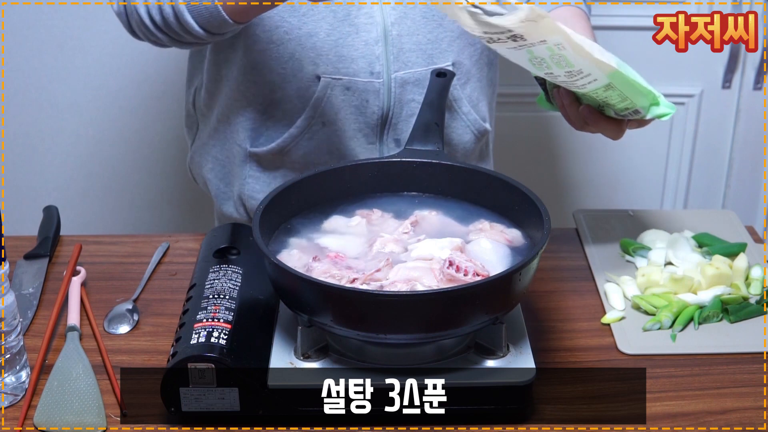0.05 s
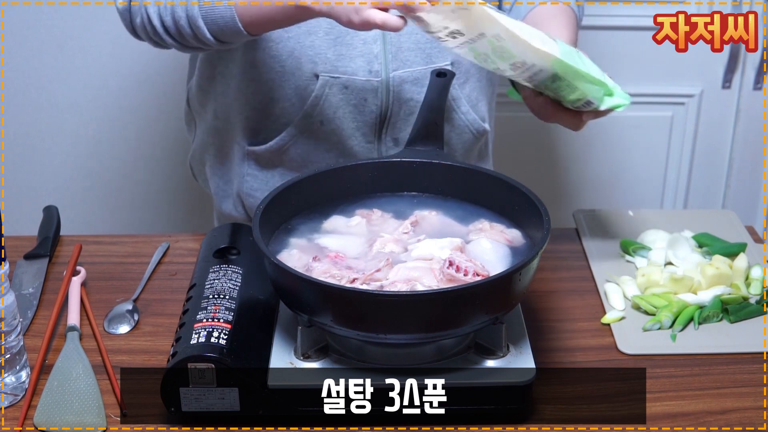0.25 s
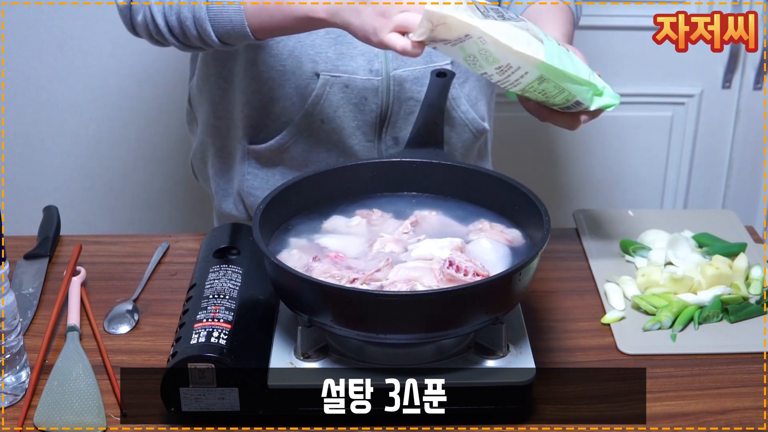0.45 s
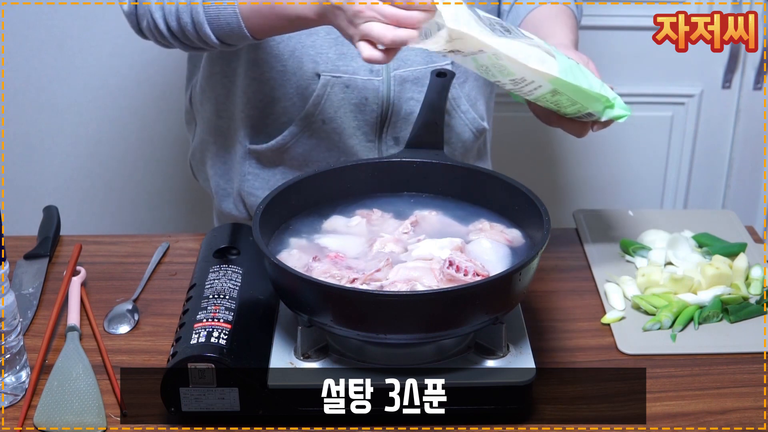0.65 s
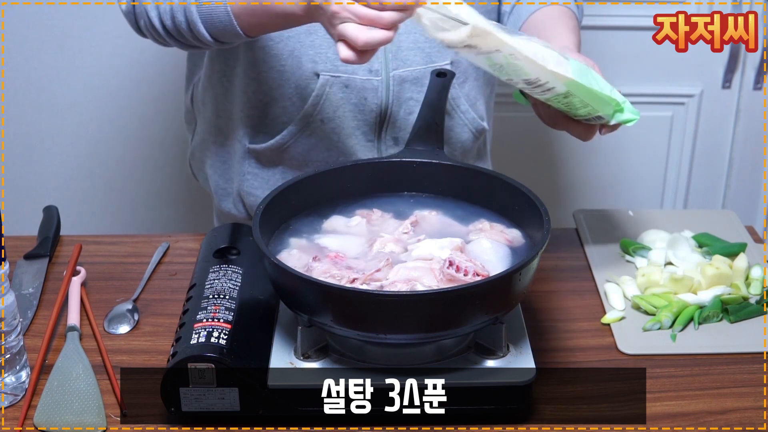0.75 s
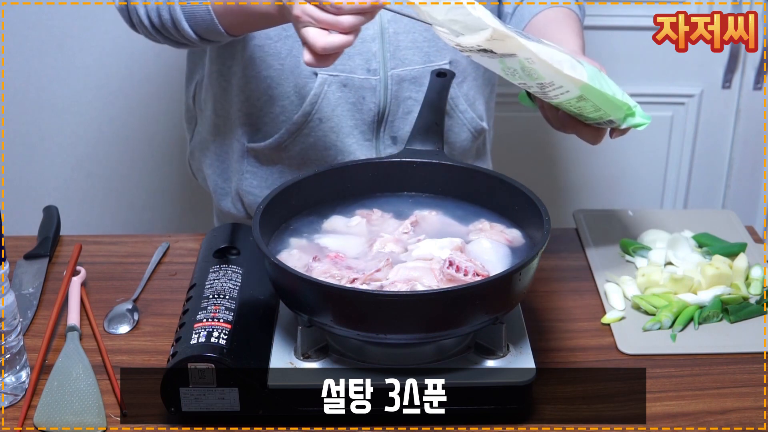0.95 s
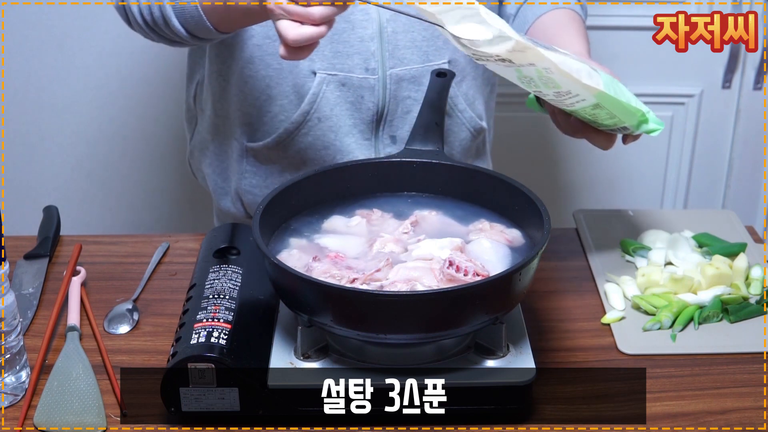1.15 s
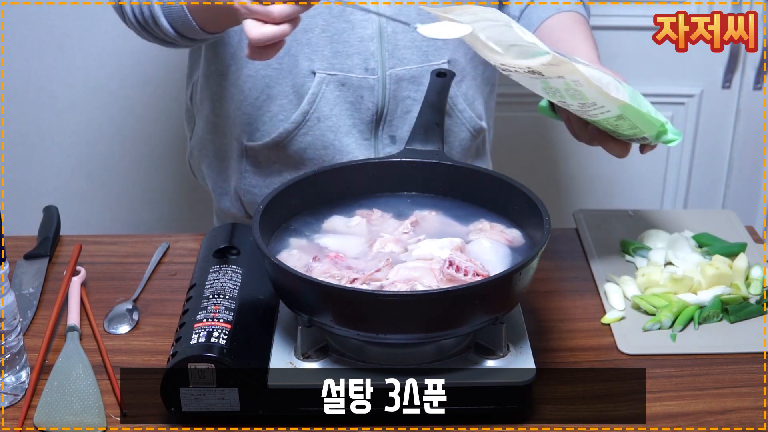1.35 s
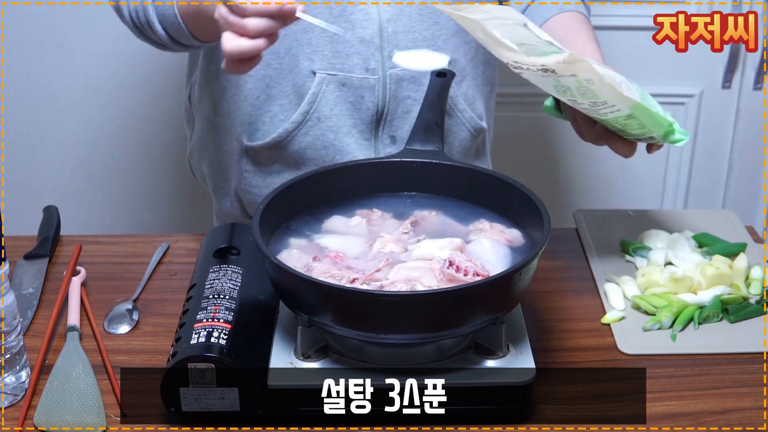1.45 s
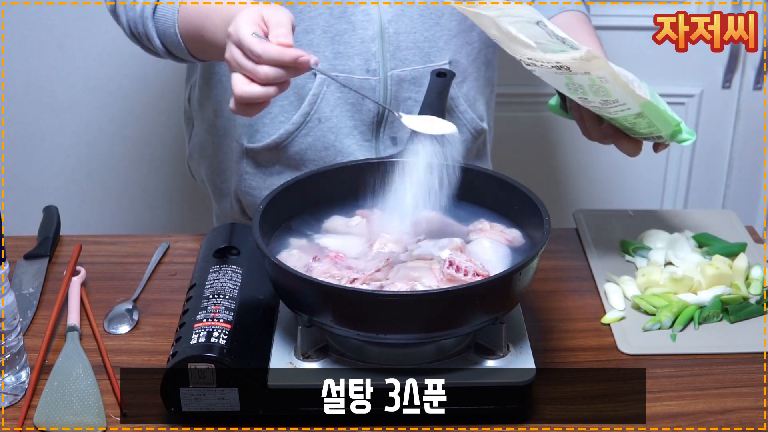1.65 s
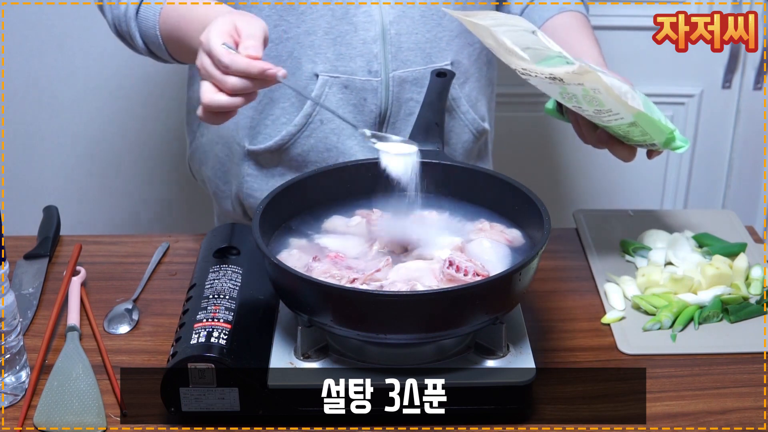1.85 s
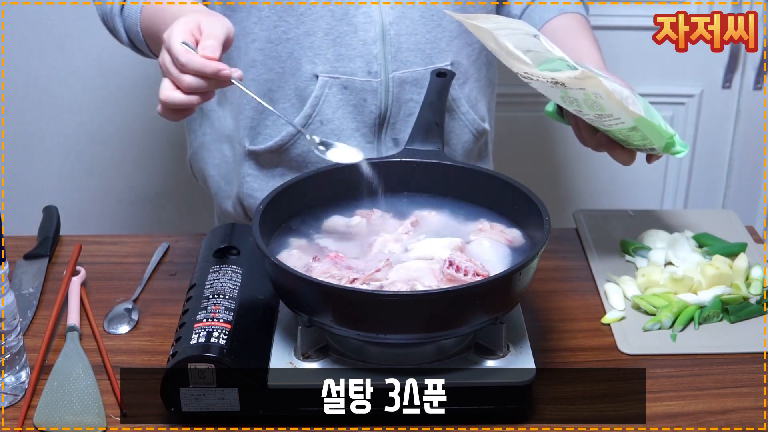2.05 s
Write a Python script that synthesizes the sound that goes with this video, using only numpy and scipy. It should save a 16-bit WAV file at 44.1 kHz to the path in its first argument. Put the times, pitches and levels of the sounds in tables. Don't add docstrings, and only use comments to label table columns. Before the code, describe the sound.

Spoon scooping granulated sugar from a crinkly bag, with crunch, fizzing grains and dull little thuds

```python
import sys
import numpy as np
from scipy import signal
from scipy.fft import rfft, irfft
from scipy.io import wavfile
from scipy.ndimage import uniform_filter1d

SR = 44100
rng = np.random.default_rng(int(sys.argv[2]) if len(sys.argv) > 2 else 0)


def how_loud(loudness_db):
    steps = np.asarray(loudness_db, float) / 20
    return 10 ** steps


def store_wav(level_fs):
    pcm = np.round(np.clip(np.atleast_2d(level_fs), -1, 1) * 32767)
    wavfile.write(sys.argv[1], SR, pcm.T.astype(np.int16))


N = 92610


def evened(x):
    return x / np.sqrt(np.mean(x ** 2) + 1e-20)


def read(points, hz):
    table_hz, value = np.transpose(points)
    return np.interp(np.log(hz + 1), np.log(table_hz + 1), value)


def colour(x, points):
    level_db = np.maximum(read(points, abs(np.fft.fftfreq(4096, 1 / SR))), -90)
    log_gain = np.log(how_loud(level_db))
    taps = np.fft.ifft(np.exp(np.conj(signal.hilbert(log_gain)))).real[:2048]
    return signal.oaconvolve(x, taps / np.linalg.norm(taps))[:N]


def resonate(x, hz, width):
    radius = np.exp(-np.pi * width / SR)
    pole = radius * np.exp(2j * np.pi * hz / SR)
    return 2 * signal.lfilter([1 - radius], [1, -pole], x).real


def wander(per_s):
    size = int(SR / per_s)
    smooth = uniform_filter1d(rng.standard_normal(N), size)
    return evened(uniform_filter1d(smooth, size))


def air():
    # (frequency [Hz], level [dB])
    spectrum = [(12, -45), (20, -21.5), (65, -0.5), (86, -14.5), (410, -15.5), (759, -23), (1000, -14.5),
                (2140, -27), (16000, -27.5)]
    # (frequency [Hz], likeness [0 to 1])
    likeness = [(60, 0.68), (180, 0.69), (550, 0.75), (1650, 0.92), (4970, 0.47), (15000, 0.32)]
    frames, hz = N // 256 + 5, np.fft.rfftfreq(1024, 1 / SR)
    a, b, c, d, patches = rng.standard_normal((frames, 513, 5)).T
    patches = uniform_filter1d(patches, size=10, axis=0)
    patches = evened(uniform_filter1d(patches, size=12, axis=1))
    same = np.clip(read(likeness, hz), -1, 1)[:, None]
    left = a + 1j * b
    right = same * left + np.sqrt(1 - same ** 2) * (c + 1j * d)
    z = np.array([left, right]) * how_loud(read(spectrum, hz)[:, None] + 1.5 * patches)
    hiss = signal.istft(z, nperseg=1024, noverlap=768)[1][:, :N]
    return how_loud(-50) * evened(hiss)


def appliance():
    # (frequency [Hz], width [Hz], level [dB])
    whistles = [(1005, 62, -1.5), (1800, 190, -10), (3540, 29, -13.5), (5010, 55, -11), (7200, 60, -8.5),
                (7640, 27, -13), (8160, 35, -8), (8370, 43, -9.5), (10600, 80, -24), (12000, 83, -25),
                (12600, 65, -17), (13600, 67, -36)]
    hum_hz, hum_db, whine_db = 60, -53, -57.5
    tone = np.sqrt(2) * np.sin(2 * np.pi * hum_hz * np.arange(N) / SR + 0.81)
    hum = tone * how_loud(hum_db + 0.68 * wander(6.5))
    rumble = how_loud(-70) * np.array([[1], [-1]]) * wander(90)
    noise = rng.standard_normal((3, N))
    pair = noise[0] + 0.62 * noise[1:]
    whine = np.zeros((2, N))
    for hz, width, db in whistles:
        whistle = evened(resonate(resonate(pair, hz, width), hz, width))
        whine += how_loud(db + 0.79 * wander(9.7)) * whistle
    return hum + rumble + how_loud(whine_db) * whine


def grains(per_s, spread_db):
    size = how_loud(spread_db * np.minimum(rng.exponential(size=N), 4)) * rng.choice([-1., 1.], N)
    return evened(size * (rng.random(N) < per_s / SR))


def crunch():
    # (frequency [Hz], level [dB])
    spectrum = [(59, -51.5), (100, -15.5), (434, -2), (940, 1), (1720, -7), (2110, -12), (2450, -10),
                (7180, -18), (9000, -24), (11700, -70), (19800, -120)]
    # (time [s], level [dB])
    pressure = [(.055, -62), (.075, -56), (.21, -71), (.226, -28.5), (.24, -20.5), (.31, -23), (.405, -37),
                (.51, -30), (.578, -42), (.592, -33), (.675, -34.5), (.72, -44.5), (.96, -47.5), (1.0, -40),
                (1.06, -50), (1.34, -63), (1.4, -49), (1.56, -77)]
    press_db = np.interp(np.arange(N) / SR, *np.transpose(pressure))
    packed = grains(per_s=1500, spread_db=1.5) * how_loud(press_db + 2.2 * wander(90))
    return colour(packed, spectrum)


def fizz():
    # (frequency [Hz], level [dB])
    spectrum = [(1200, -23), (2500, 4.5), (4000, 3), (7000, 9), (9000, 4.5), (12000, 1), (16000, -16.5)]
    # (time [s], level [dB])
    slide = [(.055, -60), (.072, -45.5), (.22, -86), (.24, -37), (.29, -36), (.31, -28), (.43, -63),
             (.46, -38), (.52, -32), (.578, -43), (.6, -41), (.74, -44.5), (.84, -39.5), (.95, -48.5),
             (.99, -44.5), (1.15, -55), (1.25, -52), (1.45, -76)]
    # (frequency [Hz], width [Hz], level [dB])
    folds = [(3080, 1500, -12.5), (4640, 360, -10.5), (6500, 850, -12.5), (8500, 300, -17.5),
             (11500, 510, -20), (13500, 870, -24)]
    loose = grains(per_s=7200, spread_db=3.5) * how_loud(1.8 * wander(120))
    ringing = np.zeros(N)
    for hz, width, db in folds:
        ringing += evened(resonate(loose, hz, width)) * how_loud(db + 4.84 * wander(30))
    slide_db = np.interp(np.arange(N) / SR, *np.transpose(slide))
    return how_loud(slide_db - 7) * (colour(loose, spectrum) + ringing)


def rattle(events, width, fade):
    out, t = np.zeros(N), np.arange(3000) / SR
    shape = (len(events), 3000)
    slips = rng.standard_normal(shape) * how_loud(2.24 * rng.exponential(size=shape))
    for (s, db, hz, ms), slip in zip(events, slips):
        u = 1000 * t / max(ms, .5)
        push = slip * u * np.exp(-fade * u)
        body = resonate(resonate(push, hz, width * hz), hz, 1.97 * width * hz)
        at = round(s * SR)
        out[at:at + 3000] += how_loud(db) * np.sqrt(ms * 12) * body / np.linalg.norm(body)
    return out


def cracks():
    # (time [s], level [dB], frequency [Hz], length [ms])
    creases = [(.207, -46, 2500, 3), (.228, -39, 4000, 2), (.237, -19.5, 6500, 3.4), (.252, -13, 3500, 4),
               (.2958, -9.5, 8750, 0.73), (.2985, -8.5, 6550, 1.8), (.372, -19.5, 2980, 1.7),
               (.443, -14, 5160, 2), (.477, -24, 11900, 2.8), (.505, -25.5, 6500, 14),
               (.513, -19, 3300, 3.5), (.525, -24, 4500, 1.1), (.586, -21.5, 4270, 3.7),
               (.598, -24, 3950, 10.3), (.621, -23, 3470, 3.6), (.686, -36, 3500, 2.3),
               (.867, -39, 2200, 1.8), (.979, -34, 4630, 7), (1.279, -50, 4000, 1.6),
               (.063, -45.5, 1970, 8), (1.09, -42, 2560, 11), (1.2, -49, 3500, 8.6),
               (1.384, -32.5, 2770, 1.6)]
    no_lows = signal.butter(2, 1500, "high", fs=SR)
    return signal.lfilter(*no_lows, rattle(creases, width=0.8, fade=2.54))


def thuds():
    # (time [s], level [dB], frequency [Hz], length [ms])
    lumps = [(.237, -11.5, 1360, 6), (.252, -7, 1540, 4.4), (.2958, -8, 1160, 2.9), (.31, -17, 1050, 5.4),
             (.419, -17, 1300, 3), (.443, -16, 1190, 4.3), (.5, -21, 1070, 4.6), (.523, -20, 900, 1.2),
             (.584, -13.5, 1110, 4.1), (.621, -25, 1280, 2), (.653, -18.5, 930, 2.3),
             (.686, -14, 1020, 4.4), (.704, -22.5, 880, 7), (.725, -30.5, 826, 13), (.885, -37.5, 840, 6.8),
             (.755, -24, 770, 5.8), (.804, -26.5, 830, 4), (.866, -27.5, 810, 4.2), (.976, -25.5, 694, 9.5),
             (1.354, -37.5, 342, 7.3), (1.384, -26.5, 850, 4.6), (1.397, -34.5, 624, 12),
             (1.435, -44, 1170, 6.1), (1.472, -42, 1130, 4.8), (1.41, -38, 1320, 6.6)]
    no_lows = signal.butter(2, 220, "high", fs=SR)
    return signal.lfilter(*no_lows, rattle(lumps, width=0.72, fade=1.52))


def tail(bands, start_s):
    taps = np.zeros(SR // 2)
    at = np.arange(0, SR // 2 - 20, 20)
    taps[at + rng.integers(0, 20, len(at))] = rng.choice([-1., 1.], len(at))
    hz, t, z = signal.stft(taps, SR, nperseg=256)
    t60 = np.maximum(read(bands, hz), .03)[:, None]
    echoes = signal.istft(z * how_loud(-60 * t / t60), SR, nperseg=256)[1]
    silence = np.zeros(round(start_s * SR))
    return np.r_[silence, echoes / np.linalg.norm(echoes)]


def in_kitchen(near):
    # (frequency [Hz], time to fall 60 dB [s])
    decay = [(200, 0.37), (1000, 0.39), (4000, 0.46), (12000, 0.54)]
    # (frequency [Hz], side level below mid [dB])
    spread = [(60, -10), (110, -13), (200, -12), (380, -17.5), (700, -14), (1290, -17.5), (2380, -10),
              (4400, -5.5), (8120, -2), (15000, -2)]
    wet_db, direct_side_db = -2, -9
    mid = near + how_loud(wet_db) * signal.fftconvolve(near, tail(decay, .004))[:N]
    side_echo = signal.fftconvolve(near, tail(decay, .002))[:N]
    apart = 1j * how_loud(direct_side_db) * rfft(near) + rfft(side_echo)
    side_db = read(spread, np.fft.rfftfreq(N, 1 / SR)) - 1.0
    side = irfft(apart * how_loud(side_db), N)
    return np.array([mid + side, mid - side])


def scene():
    background = air() + appliance()
    near = crunch() + fizz() + cracks() + thuds()
    return background + in_kitchen(near)


def roll_off(x):
    return signal.sosfilt(signal.butter(12, 16980, fs=SR, output="sos"), x)


def record(dry):
    edge = signal.firwin(401, 15760, window=("kaiser", 9), fs=SR)
    mix = signal.oaconvolve(dry, edge[None], "same")
    return roll_off(mix)


dry = scene()
out = record(dry)
store_wav(out)
```